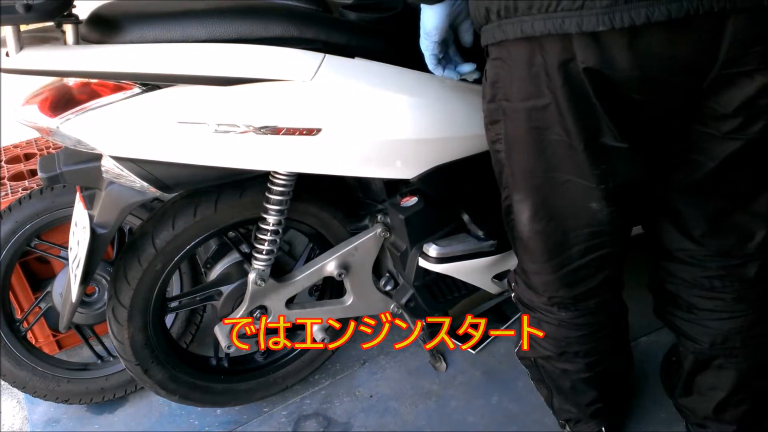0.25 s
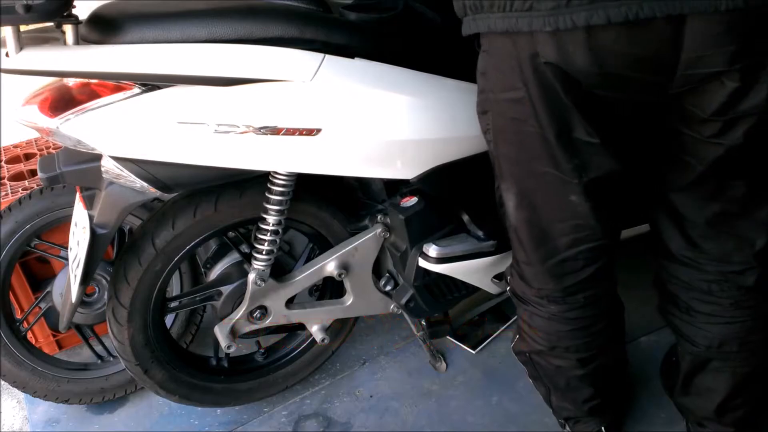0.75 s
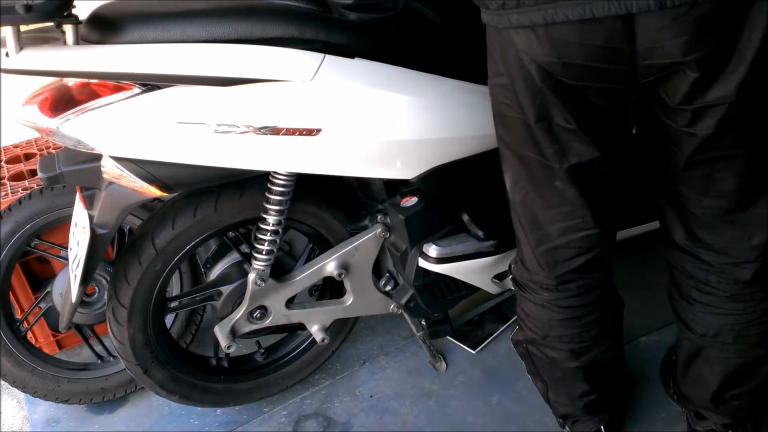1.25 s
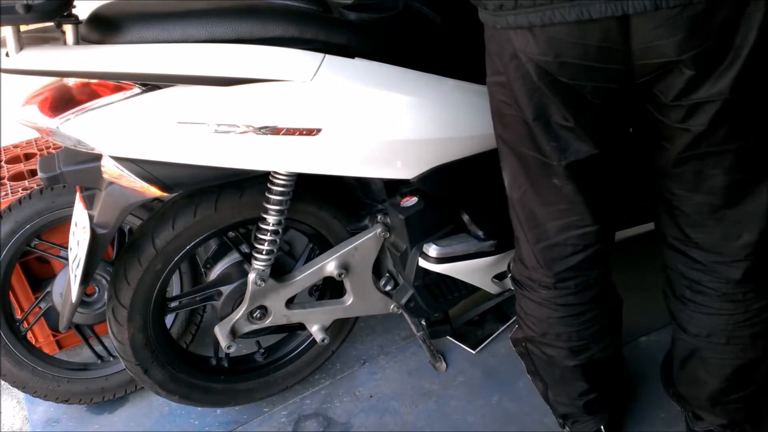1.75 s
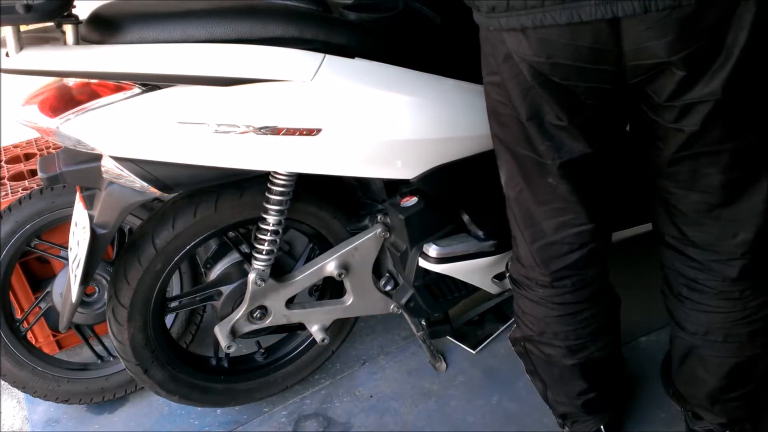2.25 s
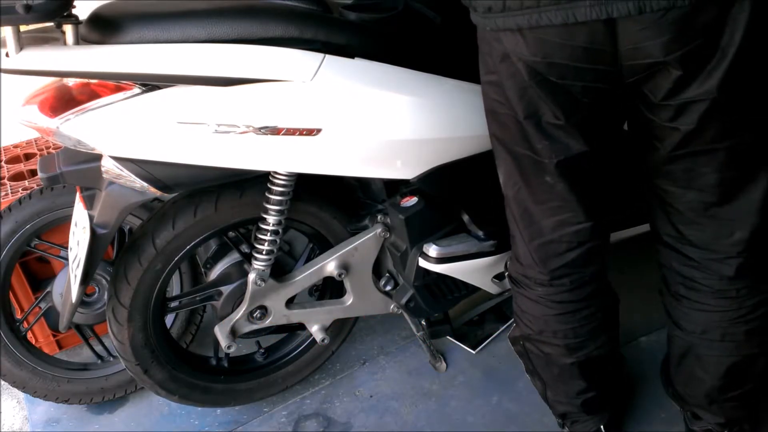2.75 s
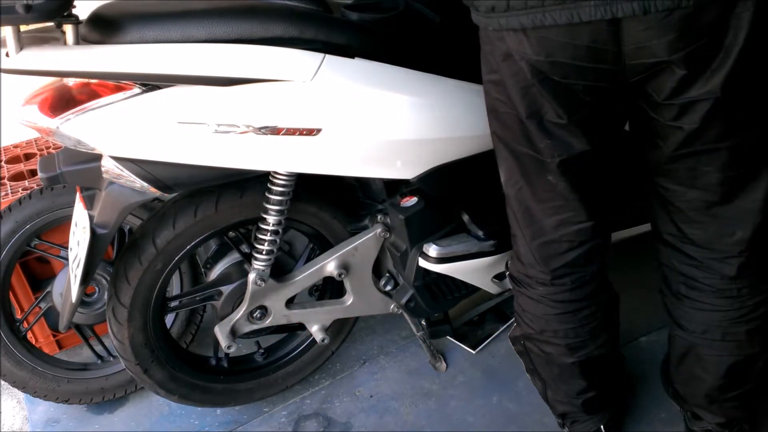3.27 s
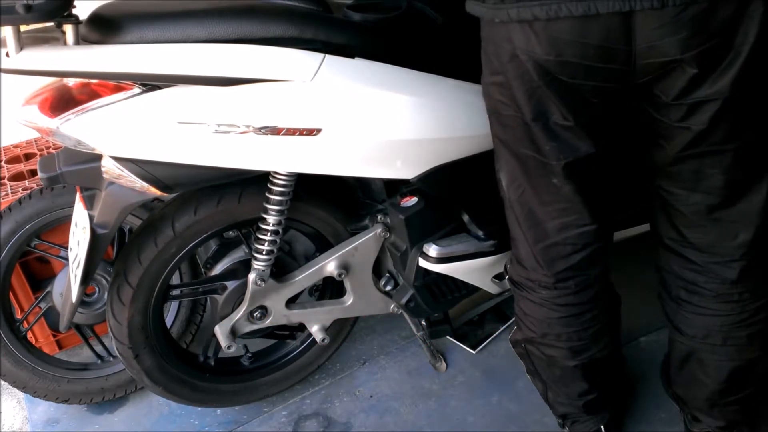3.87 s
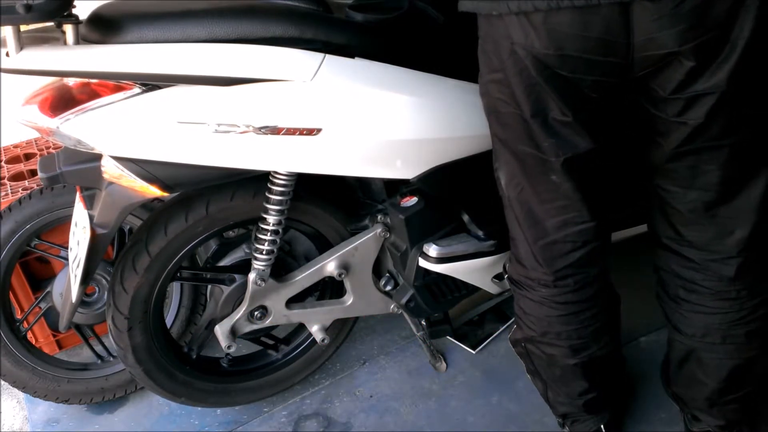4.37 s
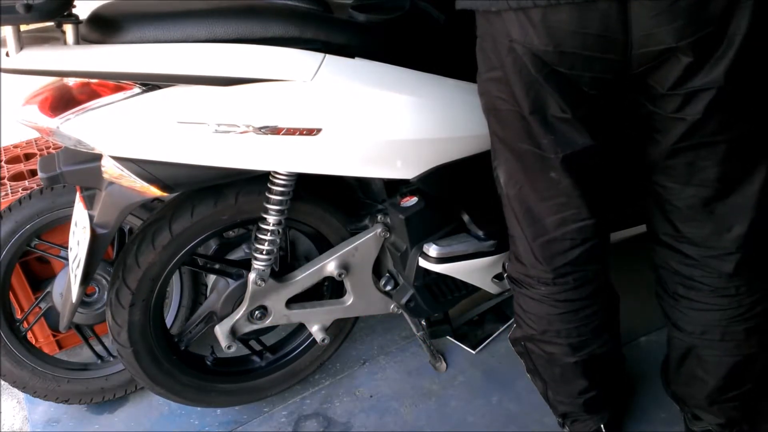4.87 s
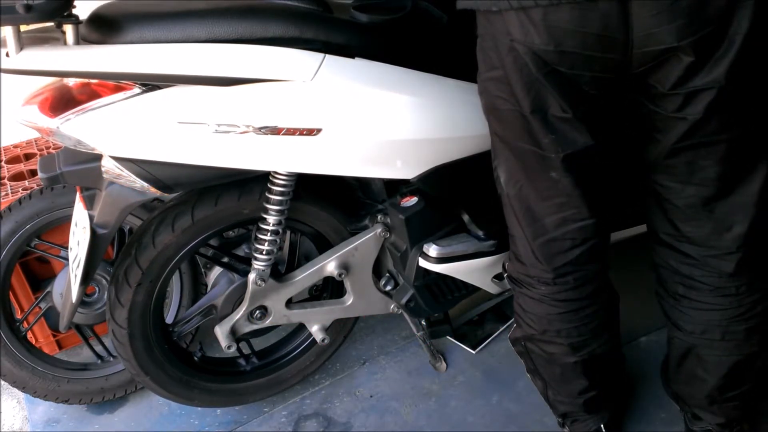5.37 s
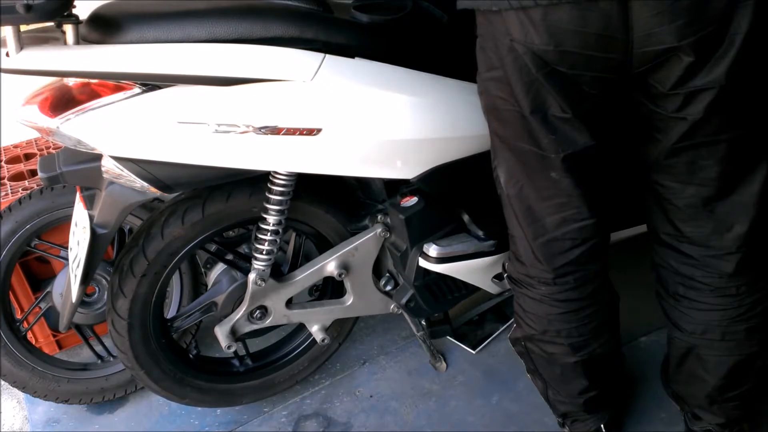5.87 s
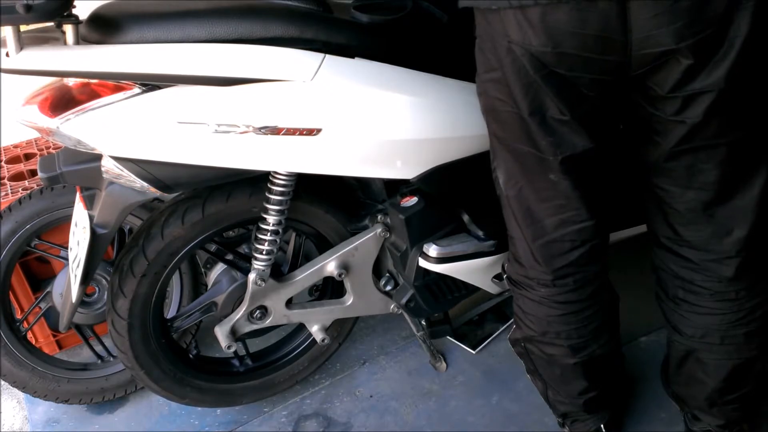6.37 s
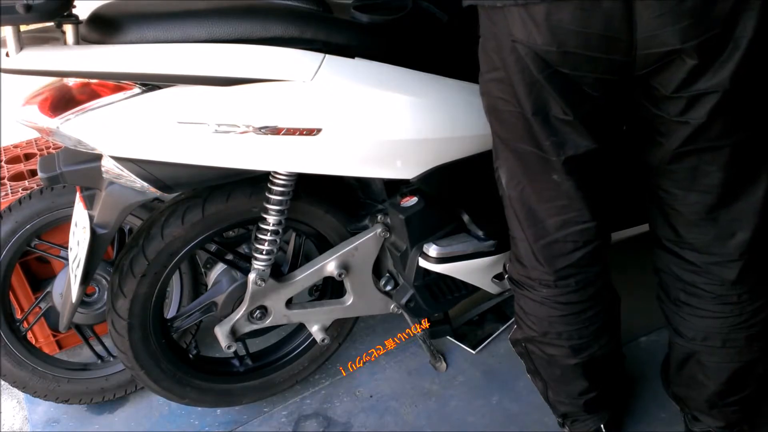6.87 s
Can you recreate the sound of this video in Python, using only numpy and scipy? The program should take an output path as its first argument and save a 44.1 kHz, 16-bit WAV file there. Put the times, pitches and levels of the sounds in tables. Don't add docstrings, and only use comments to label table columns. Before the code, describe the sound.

In a quiet workshop, light clicks and cloth rustle lead to a short crank and a harsh, bare-exhaust engine popping for under three seconds.

```python
import sys
import numpy as np
from scipy import signal
from scipy.fft import rfft, irfft, next_fast_len
from scipy.io import wavfile
from scipy.ndimage import uniform_filter1d

SR = 44100
rng = np.random.default_rng(int(sys.argv[2]) if len(sys.argv) > 2 else 0)


def master_out(mix):
    frames = np.transpose(np.atleast_2d(mix))
    ceiling = np.clip(frames, -1, 1)
    pcm = np.round(ceiling * 32767).astype(np.int16)
    wavfile.write(sys.argv[1], SR, pcm)


def elevation(decibels):
    levels = np.asarray(decibels, float)
    return 10 ** (levels / 20)


N = 313992
FIRST_FIRING_S, LAST_FIRING_OVER_S = 2.9494, 5.52


def unit(x):
    return x / np.sqrt(np.mean(x ** 2) + 1e-20)


def along(points, hz):
    f, v = np.transpose(points)
    return np.interp(np.log(hz + 1), np.log(f + 1), v)


def filtered(x, response):
    m = next_fast_len(x.shape[-1] + 4096)
    gain = response(np.fft.rfftfreq(m, 1 / SR) + 1e-3)
    return irfft(rfft(x, m) * gain, m)[..., :x.shape[-1]]


def band(lo_hz, hi_hz):
    return lambda f: 1 / np.sqrt((1 + (lo_hz / f) ** 12) * (1 + (f / hi_hz) ** 12))


def peaked(colour, modes, base):
    def gain(f):
        peaks = sum(elevation(db) / (1 + (2 * (f - centre) / width) ** 2) for centre, width, db in modes)
        return colour(f) * (abs(base) + peaks)
    return gain


def noise(colour, alike, rough_db=0, patchy_db=0, lag=0):
    a, b, rag = rng.standard_normal((3, N))
    turn = np.arccos(np.clip(alike, -1, 1)) / 2
    left = np.roll(np.cos(turn) * a + np.sin(turn) * b, lag)
    pair = np.array([left, np.cos(turn) * a - np.sin(turn) * b])
    if patchy_db:
        z = signal.stft(pair, nperseg=512)[2]
        field = uniform_filter1d(rng.standard_normal(z.shape[1:]), size=4, axis=0)
        field = uniform_filter1d(field, size=6, axis=1)
        pair = signal.istft(z * elevation(patchy_db * unit(field)), nperseg=512)[1][:, :N]
    ragged = elevation(rough_db * unit(uniform_filter1d(rag, size=40)))
    return unit(filtered(pair * ragged, colour))


def bursts(times, levels_db, rise, t60, bend=1):
    env, t = np.zeros(N + SR), np.arange(SR // 2) / SR
    for s, db, fall in zip(times, levels_db, np.broadcast_to(t60, len(times))):
        burst = elevation(db - 60 * (t / fall) ** bend) * (1 - np.exp(-(t / rise) ** 2))
        env[round(s * SR):][:len(t)] += burst
    return env[:N]


# time in seconds, firings per second.
ENGINE_SPEED = [(2.95, 11.74), (3.18, 15.04), (3.5, 16.13), (3.6, 16.63), (3.98, 16.97), (4.44, 16.91),
                (4.57, 16.07), (4.68, 17.23), (4.8, 15.62), (4.91, 16.92), (5.25, 16.62), (5.48, 16.55)]
# low pipe modes, high pipe modes, jet sizzle, hiss and rasp in dB.
FIRING_DB = (-14, -15.5, -11, -19, -22.5)
FIRING_SCATTER_DB = (0.6, 0.6, .3, .3, .5)
# time in seconds, extra sizzle in dB, extra hiss in dB,
# sizzle tilt in dB, hiss tilt in dB.
ODD_FIRINGS = [(2.95, 3.5, 2.5, 3, -2.5), (3.03, 4, 4, -0.5, 4), (3.104, -3.5, -6, -5, 3.5),
               (3.174, 4, 5, -2, -1.5), (3.241, -4, -0.5, -1, -3.5), (3.306, 2, 8, -1.5, -0.5),
               (3.37, 0.5, 2, 2.5, -0.5), (3.433, 0, 6.5, 0.5, 3), (3.496, -4.5, -5.5, -4, -1),
               (3.558, 1.5, 2, 1, 0.5), (3.617, -3.5, 1, 2.5, 1.5), (3.677, 1, -2, -2.5, 2),
               (3.737, 4.5, -2, 0.5, 1.5), (3.796, -0.5, -5.5, -4, -2.5), (3.856, -3.5, 4, 7, -1.5),
               (3.915, 0.0, 3, -2, -2), (3.974, -1, -5.5, 5, 3.5), (4.033, 0.0, -4.5, -2, 6.5),
               (4.092, 0, -4, -0.5, 4.5), (4.151, -6.5, 4, 6, 1), (4.211, -4.5, 4.5, -0.5, 1),
               (4.269, 1, 0.5, -5, 0), (4.33, -9, -0.5, 5.5, -1), (4.388, 0, 4.5, 2.5, 0),
               (4.507, 0, 1, -5, 0.5), (4.567, 1, -2, 3, 6.5), (4.688, 4, 7, -2.5, -1),
               (4.748, 2, 4, -2.5, 0.5), (4.811, -6.5, -2.5, 5, 3.5), (4.872, -3, 2, 6, -1.5),
               (4.933, -4, -6.5, 5, 0.5), (4.992, -9.5, -2, -8.5, 0), (5.052, -2.5, 0, 2.5, 3),
               (5.11, 1, -6.5, -3.5, -4), (5.171, -1.5, 1, 1, 1.5), (5.23, -1, -2, -3, -5.5),
               (5.291, -1.5, -6.5, 1.5, -3), (5.351, 3, -0.5, 3, 1), (5.409, 6.5, 2, -2, -0.5),
               (5.471, 3, 8.5, -4, 3)]
# time in seconds, extra rasp in dB.
RASPY_FIRINGS = [(2.95, 5.5), (3.03, 8.5), (3.433, 4), (3.496, -8.5), (3.617, -9), (3.737, -2),
                 (3.796, -4.5), (3.856, 0.5), (4.151, 6), (4.211, 1.5), (4.269, -4), (4.33, -6),
                 (4.388, 0.5), (4.507, -4), (4.748, 3), (4.811, -19.5), (4.992, -11), (5.052, -4),
                 (5.11, 3), (5.23, 3), (5.351, -2), (5.409, 7.5)]
# time in seconds, low pipe modes, high pipe modes, sizzle and hiss in dB.
UNFIRED = [
    (2.634, -33, -55, -23, -33),
    (2.807, -34, -49, -66, -52),
    (2.909, -31, -38, -23, -27.5),
    (5.538, -11, -25.5, -12.5, -34),
    (5.619, -11, -32.5, -16, -29.5),
    (5.755, -25, -54, -30, -41),
]


def exhaust_strokes():
    t = np.arange(FIRST_FIRING_S, ENGINE_SPEED[-1][0], 1 / SR)
    cycles = np.cumsum(np.interp(t, *np.transpose(ENGINE_SPEED))) / SR
    s = np.interp(np.arange(int(cycles[-1]) + 1), cycles, t)
    level_db = FIRING_DB + FIRING_SCATTER_DB * rng.standard_normal((len(s), len(FIRING_DB)))
    level_db = np.pad(level_db, ((0, 0), (0, 2)))
    for at, sizzle_db, hiss_db, *tilts in ODD_FIRINGS:
        pipe_db = 0.1 * hiss_db
        level_db[np.argmin(abs(s - at))] += [0, pipe_db, sizzle_db, hiss_db, 0, *tilts]
    for at, rasp_db in RASPY_FIRINGS:
        level_db[np.argmin(abs(s - at)), 4] += rasp_db
    unfired = [(*row, row[-1] + 1, 0, 0) for row in UNFIRED]
    return np.vstack([np.column_stack([s, level_db]), unfired])


# pitch in Hz, peak in seconds after the stroke, spread in seconds, left port in dB, right
# port in dB.
PIPE_MODES = [(94, 0.0238, 0.01, -3.0, -5.5), (125, 0.0074, 0.0069, -6.5, -10.5),
              (136, 0.0474, 0.0031, -12.0, -11.0), (147, 0.0367, 0.0087, -9.5, -10.0),
              (166, 0.019, 0.0031, 0.5, 1.0), (217, 0.0073, 0.008, -0.5, -3.0),
              (272, 0.0255, 0.01, -8.0, -17.0), (332, 0.0393, 0.0086, -13.5, -15.0),
              (345, 0.0124, 0.0067, 1.5, 0.0), (357, 0.0199, 0.007, -1.0, 0.0),
              (372, 0.0114, 0.0033, 1.0, -1.0), (408, 0.0109, 0.001, 5.0, 1.0),
              (487, 0.0395, 0.0096, -13.0, -21.0), (533, 0.0348, 0.0084, -6.5, -8.5),
              (541, 0.0488, 0.0019, -2.0, -10.0), (551, 0.0277, 0.001, 2.0, -7.5),
              (599, 0.0416, 0.01, -5.5, -25.5), (604, 0.0274, 0.01, -3.0, -40.0),
              (614, -0.0038, 0.0048, -15.0, -40.0), (676, 0.0314, 0.0063, -3.5, -6.5),
              (714, 0.0197, 0.0056, 5.5, 3.0), (781, 0.045, 0.01, -24.0, -29.0),
              (810, 0.0207, 0.0051, -4.5, -5.0), (831, 0.0341, 0.0099, -40.0, -13.0),
              (896, 0.0476, 0.0089, -13.0, -38.5), (903, -0.0037, 0.0066, -15.5, -32.5),
              (956, 0.0424, 0.0035, -23.0, -5.5), (967, 0.0232, 0.0054, -9.5, -13.5),
              (972, 0.0347, 0.0082, -7.0, -4.5), (1050, 0.0279, 0.0037, 0.5, -38.0),
              (1074, 0.0284, 0.0024, 0.5, -6.5), (1083, 0.0368, 0.0049, -8.5, -40.0),
              (1103, 0.0203, 0.0033, 1.5, -0.5), (1304, 0.006, 0.0084, -7.0, -19.5),
              (1304, 0.0125, 0.01, -9.0, -24.5), (1309, 0.0012, 0.001, -6.0, -10.0),
              (78, .029, 0.015, -5, -10.5)]
# frequency in Hz, radians the right port leads.
PORT_TURN = [(80, 2.04), (200, 2.38), (400, 2.98), (700, 3.03), (1000, 2.41), (1400, 3.58)]


def pipe(strokes):
    split_hz, scatter_db, slip_rad, warmth = 330, 1.3, 0.16, 0.007
    unfired_fade_db_per_s = 250
    hz, peak, spread, left_db, right_db = np.transpose(PIPE_MODES)[..., None]
    out, t = np.zeros((2, N + SR)), np.arange(-SR // 50, SR // 10) / SR
    after = np.clip(t, 0, 1)
    opening = np.where(peak < 0, 1, 1 - np.exp(-after / 0.00055))
    swell = np.exp(-.5 * ((t - peak) / spread) ** 2) * opening
    turn = along(PORT_TURN, hz)
    highness = 1 / (1 + (split_hz / hz) ** 6)
    chance = rng.standard_normal((len(strokes), 3, len(hz), 1))
    chance = unit(uniform_filter1d(chance, size=5, axis=2))
    for (s, low_db, high_db, *_), (size, shift, heat) in zip(strokes, chance):
        gain = swell * elevation(low_db + highness * (high_db - low_db) + 1.0 + scatter_db * size)
        gain *= elevation(-unfired_fade_db_per_s * after * (high_db < -25))
        phase = 2 * np.pi * hz * (1 + warmth * heat[0]) * (t - peak) + slip_rad * shift
        left = np.sum(gain * elevation(left_db) * np.cos(phase), 0)
        right = np.sum(gain * elevation(right_db) * np.cos(phase + turn), 0)
        out[:, round((s + t[0]) * SR):][:, :len(t)] += [left, right]
    return out[:, :N]


# low edge in Hz, high edge in Hz, rise in seconds,
# spit t60 in seconds, tail t60 in seconds, tail over spit in dB, trim in dB.
JET_LAYERS = [
    (7850, 14000, 0.0016, 0.026, 0.15, -7.5, -1.5),
    (3950, 6550, 0.0072, 0.081, 0.16, 9, -9.5),
    (1190, 6200, 0.005, 0.039, 0.39, 0, -7.5),
]
# pitch in Hz, width in Hz, level in dB.
TREBLE_PEAKS = [(4750, 29, 1), (5180, 17, -6.5), (5790, 110, -0.5), (6334, 55, -0.5), (6150, 9.6, -12.5),
                (7870, 61, -4), (8440, 160, -4.5), (9650, 120, -0.5), (10090, 230, -5)]
# pitch in Hz, width in Hz, level in dB.
BRACKETS = [(1300, 40, -3), (1600, 150, -3), (1900, 200, -1)]


def jet(strokes):
    port_lag_s = .0005
    hollow_hz = 2700
    s, low_db, high_db, *levels, sizzle_tilt, hiss_tilt = np.transpose(strokes)
    out = bursts(s, high_db - 12.5, 0.012, 0.35) * noise(band(150, 1180), -0.1, rough_db=-2.0)
    out += bursts(s, low_db - 22.5, 0.018, 0.25) * noise(band(30, 90), .2)

    tilts = [(sizzle_tilt, 9000), (hiss_tilt, 5200), (0 * s, 5200)]
    for layer, db, (tilt_db, split_hz) in zip(JET_LAYERS, levels, tilts):
        lo_hz, hi_hz, rise, spit, tail, tail_db, trim_db = layer

        def hollowed(f):
            return band(lo_hz, hi_hz)(f) * (1 - 0.26 / (1 + ((f - hollow_hz) / 350) ** 2))

        colour = peaked(hollowed, TREBLE_PEAKS + BRACKETS, base=0.44)
        gas = noise(colour, -.55, rough_db=3.2, patchy_db=5.0, lag=round(port_lag_s * SR))
        dull = filtered(gas, lambda f: 1 / (1 + (f / split_hz) ** 20))
        for part, part_db in ((dull, db - tilt_db), (gas - dull, db + tilt_db)):
            spit_env = bursts(s, part_db + trim_db, rise, spit)
            tail_env = bursts(s, part_db + trim_db + tail_db, rise, tail)
            out += part * (spit_env + tail_env)

    slow = (high_db < -30) & (s > LAST_FIRING_OVER_S)
    held = bursts(s[slow], levels[0][slow] - 10, .003, .045, bend=4)
    return out + held * noise(peaked(band(8500, 11000), TREBLE_PEAKS, base=0.67), -.5, patchy_db=4.0)


# crest in seconds, pitch in Hz,
# glide in Hz per second, level in dB, spread in seconds.
RINGS = [(.068, 1110, 0, -56, .006), (.095, 1100, 0, -59, .009), (.172, 560, 0, -55, .007),
         (.802, 1650, 0, -52, .003), (.805, 1200, 0, -47, .004), (.815, 550, 0, -58, .012),
         (.826, 1650, 0, -54, .004), (1.2, 1300, 0, -51, .004), (1.22, 1600, 0, -53, .004),
         (1.661, 1100, 0, -64, .01), (2.487, 500, 0, -54, .0036), (2.64, 1110, 0, -43, .006),
         (2.775, 1710, 0, -50, .008), (2.795, 1100, 0, -47, .005), (2.92, 2950, 0, -33, .005),
         (2.927, 1140, 0, -26, .006), (5.59, 2200, 0, -44, .01), (5.625, 1900, 0, -39, .005),
         (5.685, 2200, 0, -46, .012), (5.7, 1520, 0, -44, .018), (5.74, 1500, 0, -48, .015),
         (5.762, 205, 900, -30, .006), (5.779, 268, 300, -26.5, .012), (5.775, 1530, 0, -45, .01),
         (5.85, 337, 0, -47, .015), (5.85, 1520, 0, -50, .035), (5.86, 610, 0, -52, .012),
         (5.82, 400, 0, -48, .006), (5.86, 2200, 0, -53, .015), (5.9, 2410, 0, -55, .012),
         (5.7, 75, 0, -38, .025), (5.84, 80, 0, -42, .02), (5.91, 80, 0, -44, .015),
         (6.016, 2400, 0, -66, .0076), (6.89, 590, 0, -57, .03), (5.565, 320, 0, -31, .008),
         (5.65, 300, 0, -33, .01), (5.69, 330, 0, -40, .012)]
# crest in seconds, pitch in Hz,
# glide in Hz per second, level in dB, spread in seconds.
BARKS = [(2.958, 1960, 9000, -18.5, 0.0028), (2.965, 2280, -2.5, -23, 0.0056),
         (3.042, 1860, 0, -19.5, 0.0055), (3.05, 1600, 0, -24, 0.0032), (3.25, 1900, -3, -20, .005),
         (3.312, 2060, 0, -25, .004), (3.318, 2350, 0, -26.5, .004), (3.445, 1960, 0.5, -21.5, 0.007),
         (4.155, 1860, -3, -21.5, 0.0071), (4.222, 2110, 1, -26, 0.0086), (4.245, 2000, 0, -26, .004),
         (4.76, 1910, -3, -23, 0.0073), (5.42, 1570, 1, -26.5, 0.016), (5.485, 1870, -2, -28, .008)]


def loose_parts():
    out, t = np.zeros(N + SR), np.arange(-SR // 20, SR // 8) / SR
    for s, hz, glide, db, spread in RINGS + BARKS:
        swell = elevation(db) * np.exp(-.5 * (t / spread) ** 2)
        ring = swell * np.sin(2 * np.pi * (hz + glide * t / 2) * t)
        out[round((s + t[0]) * SR):][:len(t)] += ring
    return out[:N] * np.array([[1.3], [-.6]])


# time in seconds, level in dB.
GEAR_LOAD = [(2.5, -49), (2.68, -50), (2.76, -50.5), (2.95, -43), (3.1, -32), (4.0, -31.5), (5.0, -30.5),
             (5.32, -32.5), (5.44, -28.5), (5.56, -43), (5.68, -47.5), (5.8, -50.5), (5.9, -55.5),
             (5.98, -50)]
# pitch in Hz, width in Hz, level in dB.
GEAR_MODES = [(680, 80, -29.5), (1287, 28, -7.5), (1527, 27, 0.5), (2258, 64, -4), (3540, 77, -16.5)]


def gear(strokes):
    on_s, off_s = 2.482, 5.963
    idle_load_db, growl_db, growl_follows = -29, -29, 1.2
    sizzle_db, sizzle_fade_db_per_s = -2.5, 127.5
    starter_growl_db = -6.5
    t = np.arange(N) / SR
    load_db = np.interp(t, *np.transpose(GEAR_LOAD))
    turning = np.clip(np.minimum(t - on_s, off_s - t) / .03, 0, 1)
    rasp = turning * elevation(load_db)
    sizzle = rasp * elevation(sizzle_db - sizzle_fade_db_per_s * np.clip(t - LAST_FIRING_OVER_S, 0, None))
    growl_level_db = growl_db + growl_follows * (load_db - idle_load_db)
    growl = turning * elevation(growl_level_db + starter_growl_db * (t < FIRST_FIRING_S))

    fired = [row[0] for row in strokes if row[2] > -20]
    since = t - np.take(fired, np.searchsorted(fired, t) - 1)
    sag = elevation(np.where((since > 0) & (since < .08), 5 - 300 * since, 0))

    rasp_colour = peaked(lambda f: band(1200, 6700)(f) ** 2, GEAR_MODES, base=.4)
    sizzle_colour = peaked(band(7200, 11000), TREBLE_PEAKS, base=1.0)
    growl_colour = peaked(band(200, 1200), GEAR_MODES, base=0.6)
    whirr = rasp * noise(rasp_colour, -.3, rough_db=1.5, patchy_db=2.2)
    whirr += elevation(-4.0) * sizzle * noise(sizzle_colour, 0, rough_db=1.0, patchy_db=-1.0)
    return elevation(3.0) * sag * whirr + elevation(6.0) * np.sqrt(sag) * growl * noise(growl_colour, -0.66)


# time in seconds, peak in dB,
# knock in dB, sizzle in dB, knock pitch in Hz.
CLICKS = [(0.011, -49, 0, -14, 2140), (0.126, -55, 3.5, -10, 1500), (0.135, -40, -8.5, -7.5, 2180),
          (0.145, -57, -2, -22, 1700), (0.382, -49, -1, 2.5, 2440), (0.408, -39.5, -10.5, -1, 1150),
          (0.516, -51, -2, -0.5, 1550), (0.772, -65, 5, 3, 1600), (0.796, -72, 21, -21, 1400),
          (0.8883, -29, -3.5, -10, 2110), (0.926, -53, 10, -15, 1900), (0.988, -49, 1.5, -7, 1970),
          (1.1934, -47.5, 5.5, -26, 1580), (1.7, -60, -15, -14, 1140), (1.971, -56, -15, -2, 2030),
          (2.0594, -68, -8, 11.5, 1160), (2.1281, -62.5, -9, -2, 1150), (2.3206, -55, -20, -13, 2100),
          (6.177, -58.5, 0, -20, 2710), (6.4583, -56.5, -20.5, -16, 1805), (6.798, -52, 1, -6, 1550)]
# time in seconds, level in dB.
RUSTLE = [
    (0.0, -74.5),
    (0.41, -64),
    (0.7, -69.5),
    (0.75, -60.5),
    (1.08, -54),
    (1.41, -59.5),
    (1.71, -63),
    (1.79, -80),
    (2.45, -83),
]


def handling():
    click_t60_s, knock_width = 0.19, 0.63
    s, db, knock_db, sizzle_db, knock_hz = np.transpose(CLICKS)
    rustle_s, rustle_db = np.transpose(RUSTLE)
    rustle = elevation(np.interp(np.arange(N) / SR, rustle_s, rustle_db, -120, -120))

    def scrape(at, level_db):
        return bursts(at, level_db, 0.001, 0.72 * click_t60_s, bend=1.51)

    def metal(lo_hz, hi_hz):
        return noise(peaked(band(lo_hz, hi_hz), TREBLE_PEAKS, base=0.88), .1, rough_db=0.5, patchy_db=3.0)

    out = (elevation(-4) * rustle + scrape(s, db - 6.5)) * metal(2600, 6400)
    out += (elevation(-6) * rustle + scrape(s, db + sizzle_db - 2.5)) * metal(7400, 11000)
    body = noise(band(430, 3400), -0.38)
    for at, level_db, hz in zip(s, db + knock_db - 0.5, knock_hz):
        near = slice(round(at * SR), round(at * SR) + SR // 3)
        knock = filtered(body[:, near], lambda f: 0.12 + 1 / (1 + ((f - hz) / (knock_width * hz)) ** 2))
        out[:, near] += scrape([0], [level_db])[:knock.shape[1]] * unit(knock)
    return out


# pitch in Hz, level in dB, start in seconds, end in seconds.
PUMP_TONES = [
    (505, -76.5, 0.88, 2.45),
    (575, -80, 1.6, 2.13),
    (1150, -70, 1, 1.55),
    (1152, -72, 1.2, 2.1),
    (1760, -82, 1.5, 2.1),
    (2040, -75, 1.8, 1.9),
    (2040, -74, 2.32, 2.75),
    (5800, -77, 1.3, 1.7),
    (8260, -84, 2, 2.33),
]


def pump():
    t = np.arange(3 * SR) / SR
    drift = unit(uniform_filter1d(rng.standard_normal((len(PUMP_TONES), 2, len(t))), size=2000))
    tones = np.zeros(len(t))
    for (hz, db, start, end), (swell, slip) in zip(PUMP_TONES, drift):
        running = np.clip(np.minimum(t - start, end - t) / 0.041, 0, 1)
        tones += running * elevation(db + 3 * swell) * np.sin(2 * np.pi * hz * t + 1.1 * slip)
    return np.pad(tones, (0, N - len(t))) * elevation([[3], [-3]])


# frequency in Hz, t60 in seconds.
WALL_T60 = [(100, 0.33), (1000, 0.17), (4000, 0.13), (10000, 0.051)]


def walls(x):
    hz, t, z = signal.stft(rng.standard_normal((2, SR // 2)), SR, nperseg=256)
    decay = elevation(-60 * t / along(WALL_T60, hz)[:, None])
    tail = signal.istft(z * decay, SR, nperseg=256)[1]
    return signal.fftconvolve(x, tail / np.linalg.norm(tail[0]), axes=1)[:, :N]


# frequency in Hz, level in dB per Hz.
ROOM_TONE = [(15, -75.5), (25, -47), (64, -23), (101, -9.5), (197, -12), (229, -14.5), (412, -19),
             (468, -18.5), (759, -20), (2000, -21.5), (5120, -27.5), (10200, -44), (11000, -56),
             (14300, -90), (22000, -120)]


def workshop():
    swell, slip = unit(uniform_filter1d(rng.standard_normal((2, N)), size=2500))
    port_phase = np.array([[0], [2.2]])
    hum = elevation(1.9 * swell) * np.sin(2 * np.pi * 101 * np.arange(N) / SR + slip + port_phase)
    air = noise(lambda f: elevation(along(ROOM_TONE, f)), -0.26)
    return elevation(-59.5) * hum + elevation(-61.0) * air


def scene():
    strokes = exhaust_strokes()
    tone = pipe(strokes) + loose_parts()
    near = jet(strokes) + handling()
    room = elevation(-16.5) * walls(near + elevation(-9) * tone)
    return tone + near + room + gear(strokes) + pump() + workshop()


# frequency in Hz, gain in dB.
LEFT_PORT = [(60, -6), (200, 2.5), (1000, 0), (3500, 0), (6000, -4), (8000, 8.5), (9600, 10), (10600, 3)]
# frequency in Hz, gain in dB.
RIGHT_PORT = [(60, 7), (200, 5.5), (1000, 1), (3000, 0.5), (4200, 3.5), (5000, 3), (5800, 3.5), (6600, 0.5),
              (8000, -2), (10600, -12)]


def microphone_ports(dry):
    x = filtered(dry, lambda f: elevation([along(LEFT_PORT, f), along(RIGHT_PORT, f)]))
    x[1] = filtered(x[1], lambda f: .75 + .7 / (1 + ((f - 5100) / 450) ** 2))
    return x


def top_cut(x):
    return signal.sosfilt(signal.butter(12, 11790, fs=SR, output="sos"), x)


def record(dry):
    top_hz = 10580
    x = microphone_ports(dry)
    x = x / (1 + np.abs(x / 0.96) ** 5) ** (1 / 5)
    x = filtered(x, lambda f: 1 / np.sqrt(1 + (f / top_hz) ** 300))
    return top_cut(np.clip(x, -1, 1))


dry = scene()
out = record(dry)
master_out(out)
```